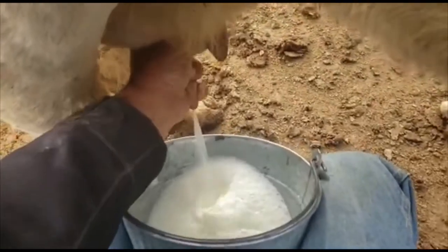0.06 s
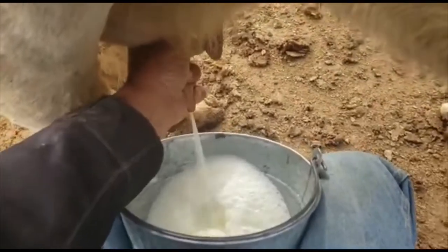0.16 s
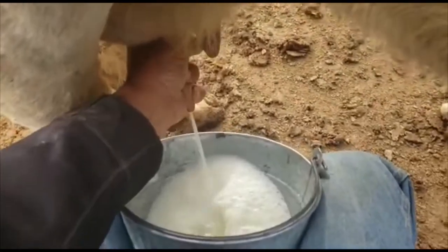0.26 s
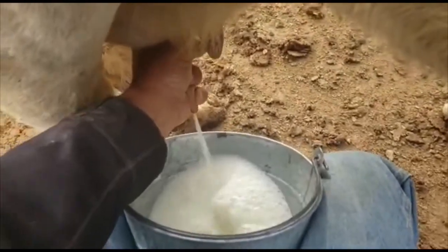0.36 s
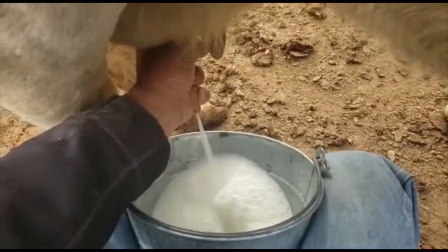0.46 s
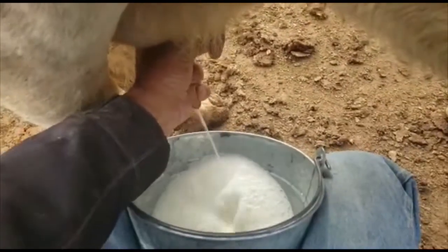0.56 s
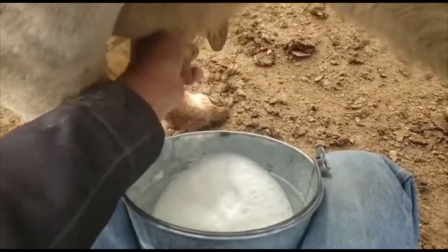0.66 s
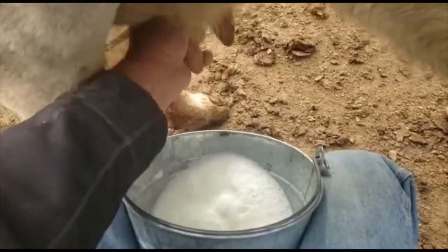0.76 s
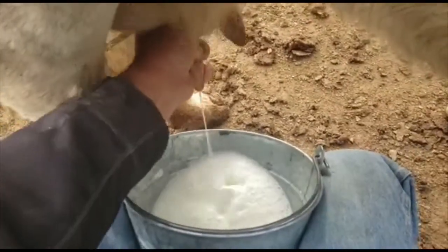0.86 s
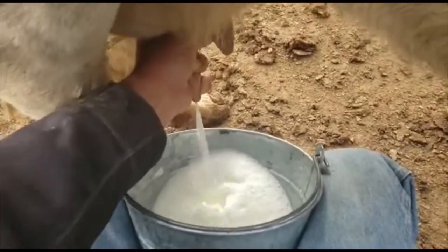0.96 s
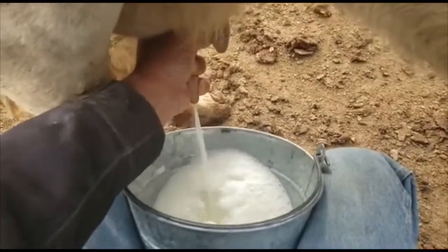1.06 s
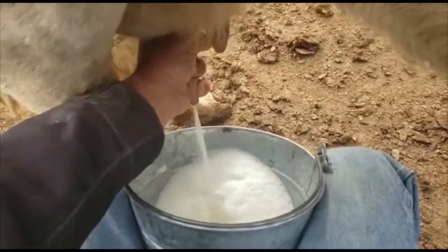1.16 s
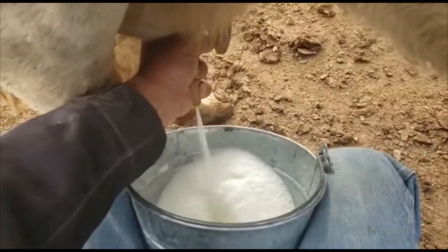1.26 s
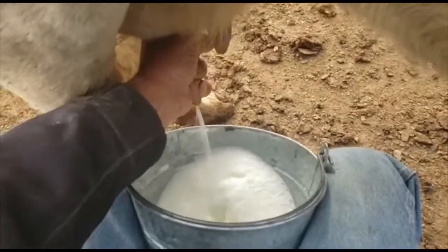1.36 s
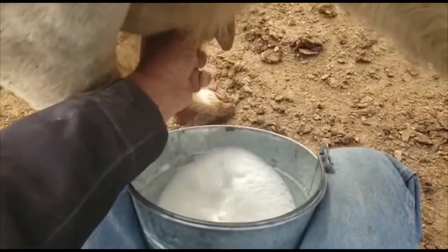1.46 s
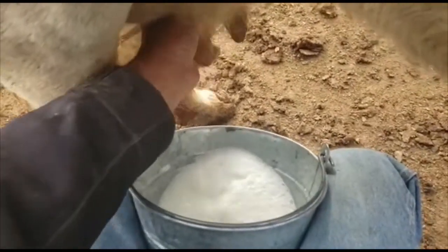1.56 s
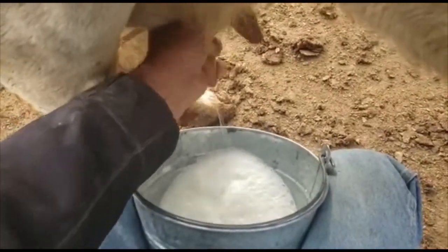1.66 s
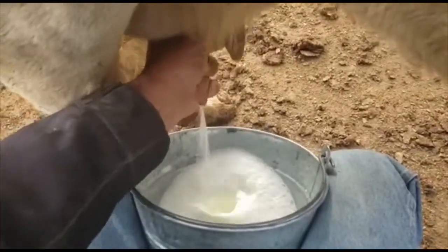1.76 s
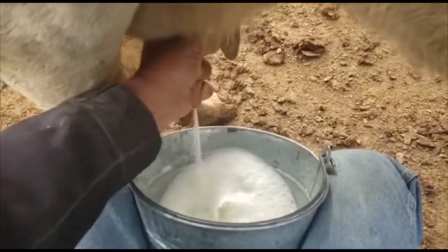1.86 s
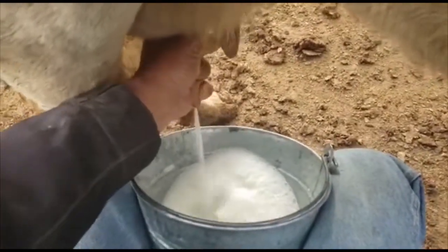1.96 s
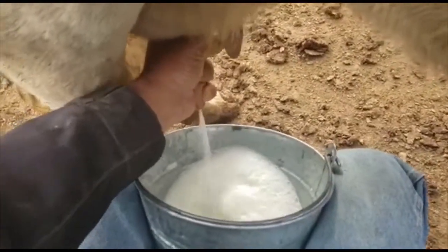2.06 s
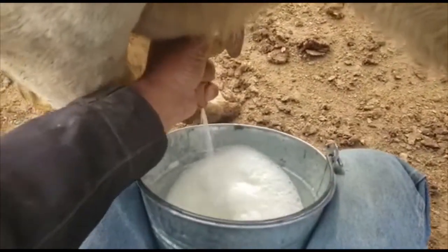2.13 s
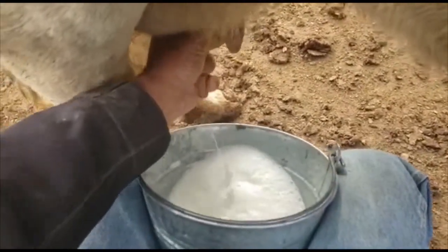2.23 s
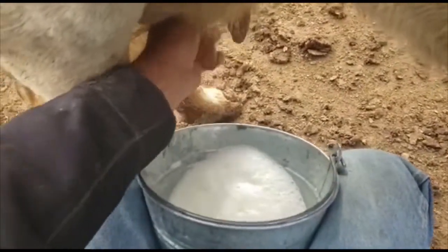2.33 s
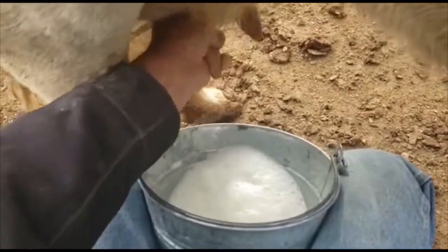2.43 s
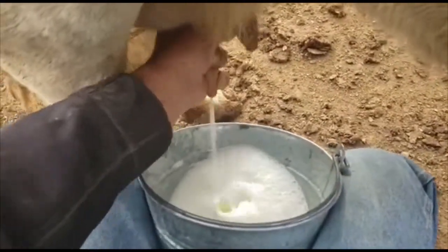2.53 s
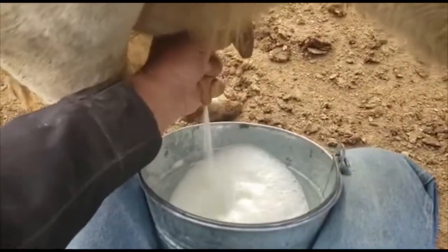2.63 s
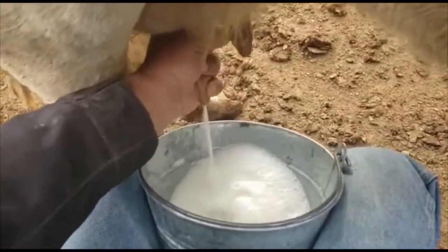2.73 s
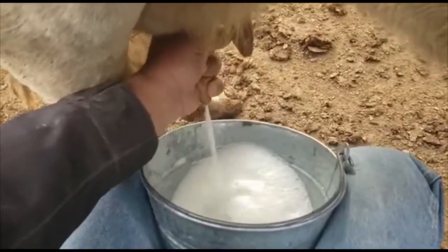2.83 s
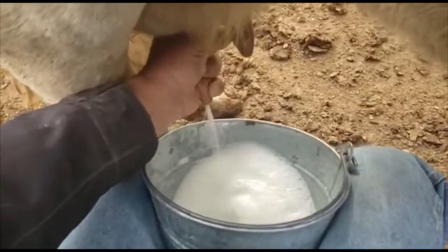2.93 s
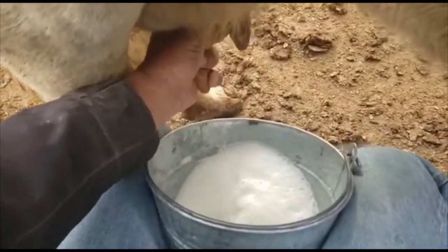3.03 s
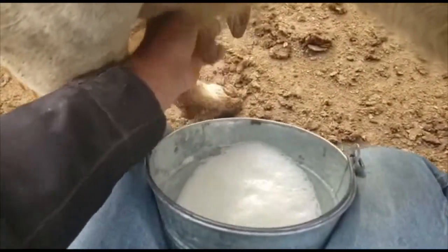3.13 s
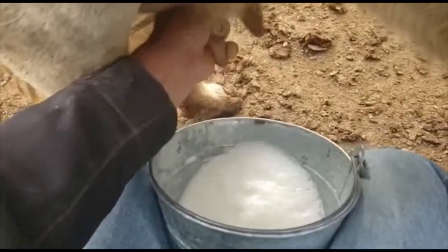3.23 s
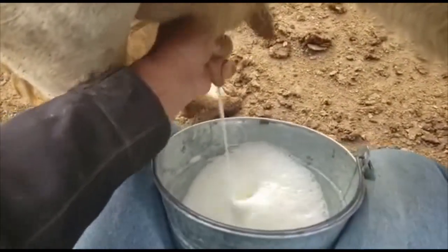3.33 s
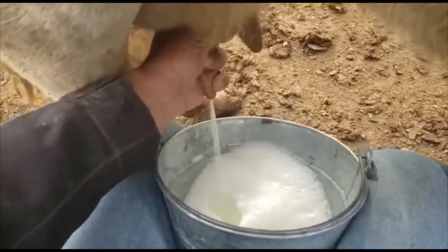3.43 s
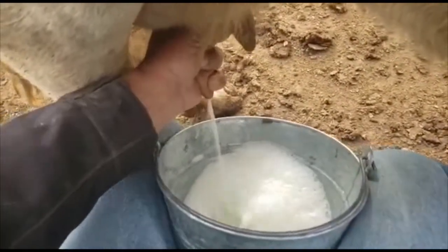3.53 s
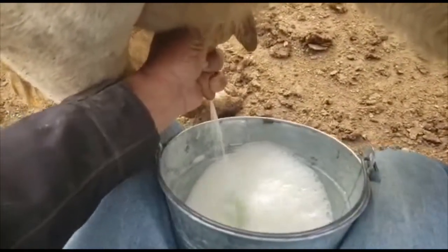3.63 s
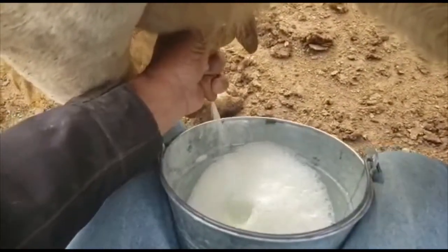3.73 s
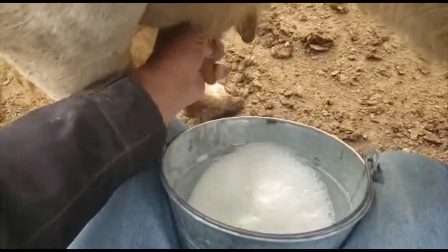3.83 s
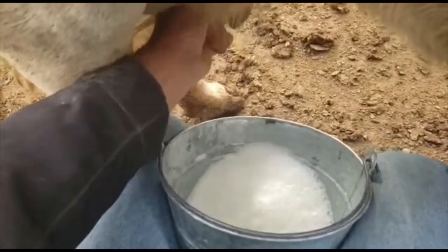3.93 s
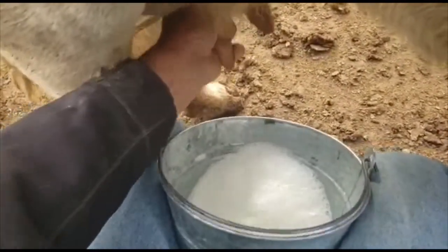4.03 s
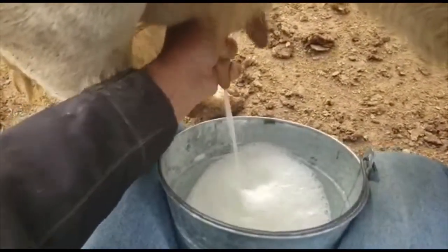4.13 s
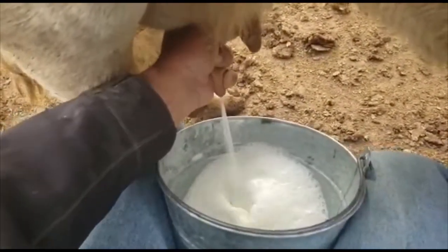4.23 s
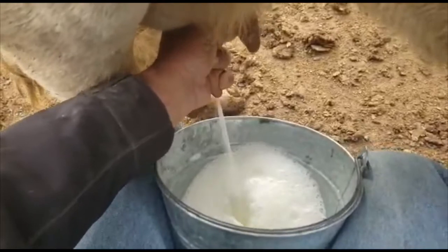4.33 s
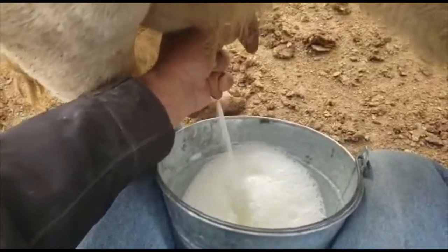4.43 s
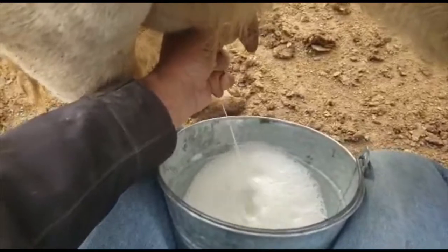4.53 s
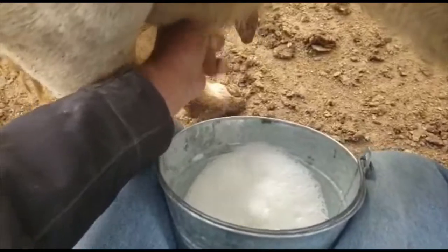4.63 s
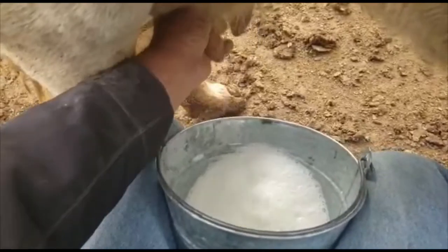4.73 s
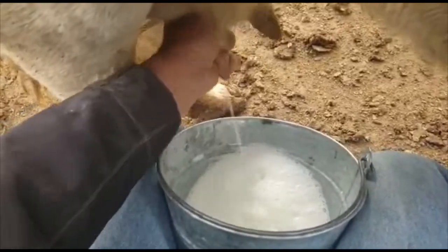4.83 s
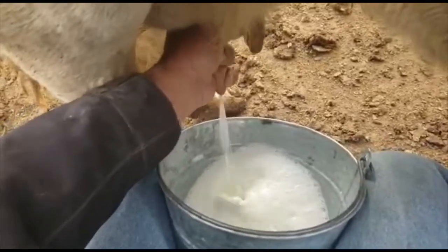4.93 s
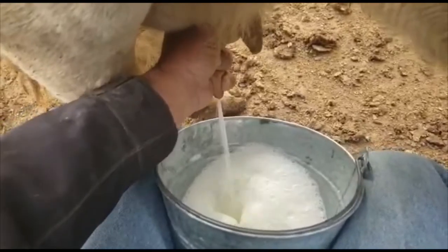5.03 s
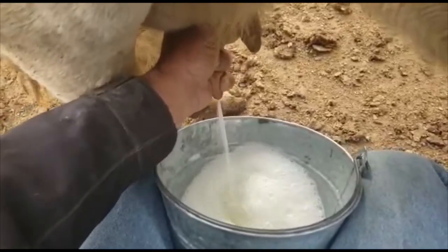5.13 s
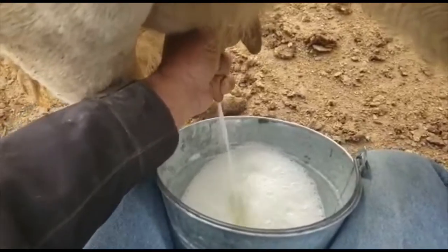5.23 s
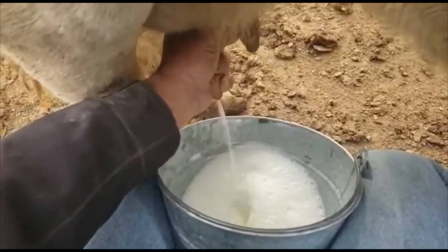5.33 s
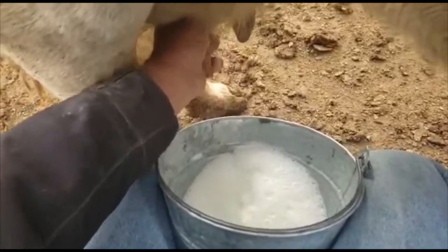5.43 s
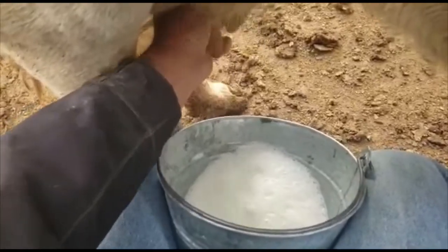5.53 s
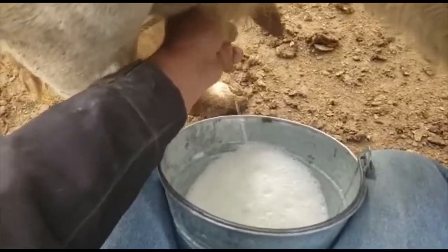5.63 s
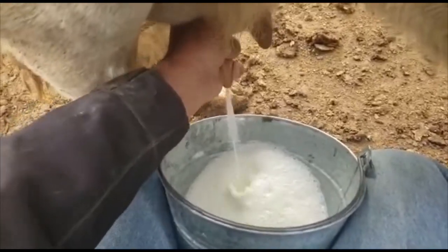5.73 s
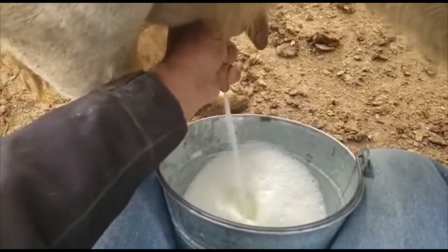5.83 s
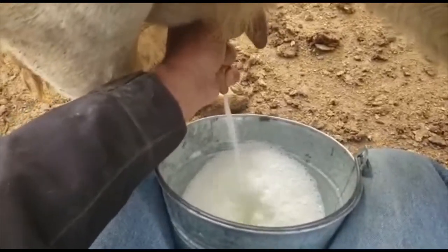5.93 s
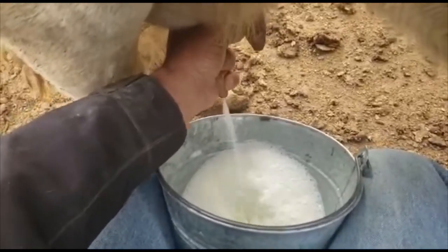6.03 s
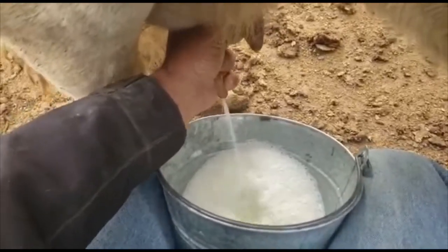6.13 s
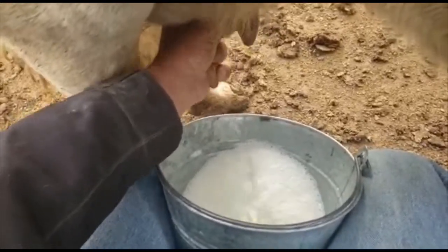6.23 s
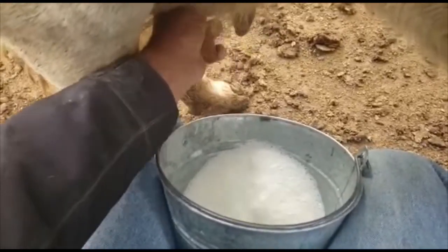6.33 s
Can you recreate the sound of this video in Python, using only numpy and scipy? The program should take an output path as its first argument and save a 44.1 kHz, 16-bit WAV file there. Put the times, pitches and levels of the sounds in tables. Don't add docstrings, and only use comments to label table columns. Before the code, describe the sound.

Rhythmic jets of milk hiss and gurgle into a foamy metal pail, with splattering drops between squirts and a distant vehicle accelerating.

```python
import sys
import numpy as np
from scipy import signal
from scipy.fft import rfft, irfft, next_fast_len
from scipy.io import wavfile
from scipy.ndimage import uniform_filter1d

SR = 44100
rng = np.random.default_rng(int(sys.argv[2]) if len(sys.argv) > 2 else 0)


def file_out(sig):
    cols = np.atleast_2d(sig).T
    lim = np.clip(cols, -1, 1)
    pcm = np.round(lim * 32767).astype(np.int16)
    wavfile.write(sys.argv[1], SR, pcm)


def invert_db(level):
    return 10 ** (np.asarray(level, dtype=float) / 20)


N = 281342

# start in seconds, time to punch through the foam in seconds, length in seconds,
# hiss level in dB, slackening time in seconds.
SQUIRTS = [
    (-.025, 0.041, 0.65, -35.5, 0.049),
    (0.836, 0.069, 0.58, -35.5, 0.019),
    (1.666, 0.067, 0.57, -35, 0.058),
    (2.472, 0.081, 0.52, -37.5, 0.043),
    (2.923, 0.04, 0.1, -57, 0.0074),
    (3.276, 0.068, 0.53, -35, 0.069),
    (4.04, 0.0051, .52, -37.5, 0.044),
    (4.811, 0.061, 0.58, -37, 0.057),
    (5.633, 0.067, 0.59, -37.5, 0.064),
]
# body level in dB re hiss, punch share as a ratio.
LANDINGS = [(3, 0.7), (0, 1.3), (3, 1.1), (2, .9), (0, .9), (.5, 0.18), (-.5, 0.5), (1, 2.2), (-1, 2.1)]
# frequency in Hz, level in dB per Hz.
HISS_SPECTRUM = [(1400, -24.5), (2300, -2), (2900, -3), (3300, -2), (4400, -1.5), (5000, 1), (7400, 0),
                 (8200, -8.5), (9200, -8), (11000, -5.5), (12300, 1.5), (14000, -2), (15600, 1.5),
                 (16300, -5)]
# start in seconds, peak in dB, length in seconds,
# fall along it in dB, low slap in dB re peak.
DRIBBLES = [(0.042, -33.5, 0.079, 3.5, 4), (0.017, -20, 0.01, 28, 6), (0.028, -28, 0.01, 13, 14.5),
            (0.874, -22.5, 0.018, 23, 11), (1.747, -29.5, 0.01, 5, 4.5), (0.826, -31, 0.0094, 12.5, -17),
            (1.42, -36, 0.0062, 10, -5), (1.662, -36, 0.012, 8, -22), (2.46, -39.5, 0.014, 2, -17),
            (3.036, -43, 0.01, 16, 0), (3.82, -32, 0.02, 5, -2.5), (4.037, -9.5, 0.03, 13.5, -14.5),
            (4.114, -17, 0.02, 16, -9.5), (4.657, -30, 0.011, 3, -7), (4.803, -35.5, 0.013, 15, -21),
            (5.461, -23, 0.0091, 14, -10), (5.468, -29.5, 0.015, 3.5, -7), (3.268, -39, 0.01, 10, -34.5),
            (5.579, -31.5, 0.0087, 5, -7.5), (5.621, -39.5, 0.011, 3, -9), (5.676, -28, 0.011, 0, -1.5),
            (5.687, -28.5, 0.034, 2, -27), (5.927, -31.5, 0.066, 3.5, -26), (5.998, -35, .07, 6, -22),
            (6.099, -36, 0.094, 11, -28), (5.647, -30, 0.01, 11, -18), (6.302, -40.5, .01, 22, 2)]
# frequency in Hz, level in dB per Hz.
SLAP_SPECTRUM = [(150, -43), (280, 12), (500, 4), (800, -9.5), (1300, -1.5), (2000, -15.5), (3000, -52)]
# start in seconds, peak in dB, T60 in seconds.
SPARKS = [(0.2383, -39, 0.012), (0.255, -18.5, 0.014), (0.8479, -28, 0.012), (1.6985, -24, 0.012),
          (2.4951, -36, 0.013), (2.5167, -23, 0.018), (2.5869, -40, 0.012), (2.6962, -17.5, 0.012),
          (2.809, -21.5, 0.014), (2.897, -23, 0.014), (3.0064, -41, 0.012), (3.3088, -32, 0.013),
          (3.3357, -27, 0.012), (3.7363, -36, 0.012), (4.0375, -14, 0.0071), (4.1, -24, 0.012),
          (4.1818, -32, 0.0084), (4.321, -27, 0.012), (4.831, -21, 0.013), (5.1202, -37, 0.012),
          (5.462, -37, 0.012), (5.631, -36, 0.011), (5.662, -22, 0.014), (6.0933, -19, 0.012)]
# start in seconds, peak in dB, pitch in Hz, T60 in seconds.
SPITS = [(0.021, -19.5, 2470, .005), (.026, -24.5, 4060, 0.011), (0.081, -28, 4050, 0.0091),
         (.8925, -31, 7000, .01), (.9045, -32, 7100, 0.0055), (1.2153, -22.5, 5850, .006),
         (1.744, -27, 3380, 0.0089), (1.748, -27, 6900, 0.0065), (3.2774, -40, 4050, .008),
         (4.398, -32, 4820, 0.0074), (6.12, -33, 4894, 0.013), (6.3006, -42.5, 5050, .008),
         (6.356, -65, 7360, 0.0076), (0.787, -52, 4300, .015), (5.96, -33, 4970, 0.011),
         (6.097, -36.5, 5200, 0.006), (0.2563, -44, 4690, 0.008), (0.2845, -20, 5260, 0.0056),
         (0.875, -15.5, 3680, 0.004), (0.9052, -17.5, 3850, 0.0057), (1.695, -23, 4100, 0.0026),
         (1.7372, -16, 3480, 0.0047), (2.515, -35, 7850, 0.008), (2.5636, -26, 6140, 0.013),
         (2.693, -54, 12200, 0.0063), (2.8984, -36, 7230, 0.0072), (3.006, -46, 7300, .009),
         (3.0355, -51, 7500, 0.0086), (3.31, -32, 4150, 0.011), (3.769, -32.5, 5270, 0.0055),
         (4.0381, -15.5, 4870, 0.0092), (4.2332, -17, 5660, 0.0038), (4.476, -34, 5200, 0.0099),
         (4.832, -37, 4230, 0.011), (4.8553, -16, 7950, 0.0061), (4.869, -21.5, 5450, 0.0084),
         (4.8875, -17, 5100, 0.0063), (4.923, -27, 5400, 0.0093), (5.7029, -13, 4750, 0.0028),
         (6.077, -23, 6200, 0.0049)]
# start in seconds, # peak in dB,
# pitch in Hz.
GULPS = [(0.031, -18, 276), (0.154, -20, 316), (0.288, -28, 294), (0.309, -18.5, 324), (.545, -25.5, 407),
         (0.874, -20, 269), (.954, -22.5, 320), (1.104, -16.5, 258), (1.296, -22, 338), (1.691, -23, 420),
         (1.737, -34, 412), (1.838, -25, 332), (2.019, -21, 323), (2.123, -19, 333), (2.504, -25, 464),
         (3.294, -26.5, 430), (3.338, -31, 433), (3.356, -17.5, 445), (3.561, -26, 377), (3.592, -21, 342),
         (4.047, -22, 278), (4.269, -22.5, 376), (4.302, -22, 353), (4.885, -21.5, 442), (4.963, -31, 306),
         (5.064, -23.5, 416), (5.26, -30.5, 400), (5.664, -27, 452), (5.83, -18, 316), (5.974, -19, 312),
         (0.217, -20, 310), (0.26, -19, 335), (0.357, -30, 320), (0.451, -42, 332), (0.845, -27, 400),
              (0.984, -21.5, 236), (1.18, -21, 330), (1.204, -32, 280), (1.366, -27, 375),
              (1.898, -25, 317), (1.939, -29, 310), (2.053, -29.5, 320), (2.542, -31, 296),
              (2.598, -30, 344), (2.657, -30, 354), (2.771, -27, 300), (2.849, -28, 350),
              (2.886, -22.5, 315), (3.422, -26.5, 353), (3.482, -30, 320), (3.691, -27, 288),
              (3.819, -34, 256), (4.119, -33, 340), (4.206, -26.5, 412), (4.356, -26, 288),
              (4.661, -43.5, 296), (4.818, -35.5, 465), (4.856, -26, 470), (5.124, -26, 291),
              (5.182, -21, 287), (5.469, -34, 295), (5.585, -34.5, 285), (5.875, -23, 350),
              (5.921, -31, 274)]
# start in seconds, peak in dB, pitch in Hz.
POPS = [(0.071, -35, 1080), (0.189, -38, 806), (0.305, -48, 1640), (0.396, -30, 2280), (0.922, -35, 1150),
        (1.246, -41, 926), (1.393, -43, 980), (1.703, -35, 748), (1.76, -42, 1770), (1.874, -38, 929),
        (2.121, -39, 920), (2.522, -31, 1000), (2.539, -34, 1020), (2.64, -39, 1040), (2.708, -34, 2160),
        (3.312, -35.5, 1170), (4.118, -32, 1190), (4.448, -53, 1000), (4.834, -36, 1190),
        (4.944, -41.5, 974), (5.088, -32, 2447), (5.286, -45, 972), (5.661, -43, 1230), (5.785, -33, 1730),
        (6.08, -41, 980)]
# start in seconds, peak in dB, pitch in Hz, T60
# in seconds.
MORE_BUBBLES = [(0.02, -24, 1020, 0.022), (0.03, -3.5, 440, 0.016), (0.875, -29, 1660, 0.0071),
                (1.736, -29, 1860, 0.02), (0.608, -45, 870, 0.025), (0.874, -16, 1090, 0.0029),
                (0.889, -43, 885, 0.025), (1.732, -28, 1110, 0.025), (2.506, -37.5, 1150, 0.038),
                (2.561, -48, 746, 0.022), (2.94, -32, 724, 0.019), (3.037, -55, 1470, 0.037),
                (3.336, -20.5, 1180, 0.01), (3.422, -39, 1230, 0.027), (3.603, -39.5, 930, 0.034),
                (4.082, -20, 1180, 0.014), (4.099, -31, 1180, 0.032), (4.172, -38, 1160, 0.048),
                (4.197, -25.5, 1210, 0.015), (4.848, -22, 1250, 0.013), (4.882, -36, 954, 0.029),
                (5.678, -28.5, 1250, 0.022), (5.702, -39, 1200, 0.031)]
# frequency in Hz, level in dB per Hz.
FIZZ_SPECTRUM = [(250, -22), (330, 9), (450, 10.5), (700, -1), (1100, -11), (2000, -4), (3300, -6),
                 (4800, -2), (7300, 0), (8300, -18), (9800, -19), (12000, -2.5), (15600, -1.5),
                 (16300, -15)]
# peak time in seconds, fizz level in dB, settling in dB per second.
STIRS = [(.5, -59.5, 36), (.81, -61, 30), (1.44, -56.5, 19), (2.18, -60, 45), (2.45, -73, 30),
         (2.98, -55, 50), (3.1, -62, 80), (3.74, -66, 25), (3.86, -51, 56), (3.96, -64, 62),
         (4.55, -72, 60), (4.69, -66.5, 52.5), (5.34, -68, 24), (5.49, -56, 112), (6.17, -58, 108.5),
         (6.33, -63.5, 86)]
# centre in Hz, width in Hz, gain in dB.
PAIL_MODES = [(1020, 410, 3), (1359, 110, -8.5), (1660, 450, 4), (2100, 250, -2), (3303, 93, 6),
              (4000, 98, 4.5), (4750, 160, 5), (5880, 740, 4), (6990, 210, 3.5), (7530, 310, 4),
              (11400, 290, 4)]
# time in seconds, centre in Hz, depth from 0 to 1.
ECHO_NOTCH = [(0, 2330, 0.7), (.14, 2300, 0.65), (.4, 2350, 0.38), (.9, 2410, 0.74), (1.3, 2470, 0.55),
              (1.71, 2350, 0.7), (1.85, 2350, 0.53), (2.1, 2250, 0.46), (3.2, 2800, 0.17), (3.3, 2680, 1),
              (3.42, 2820, 0.16), (3.7, 2080, 0.2), (6.38, 2090, 0.52)]
# start in seconds, peak in dB, pitch in Hz, T60 in seconds.
KNOCKS = [
    (0.344, -23, 52, 0.09),
]
# time in seconds, shaft rate in Hz, level in dB.
PULL = [(0, 33.66, -38), (.75, 42.1, -38), (1.16, 49, -35), (1.58, 54.6, -37), (1.97, 61.2, -39),
        (2.3, 66, -40), (2.7, 70.6, -39), (3.0, 73.4, -41), (3.1, 71.1, -49), (3.23, 65.4, -52),
        (3.46, 56.3, -50), (3.85, 47.3, -52.5)]
# time in seconds, shaft rate in Hz, level in dB.
CRUISE = [(3.8, 35.46, -50.5), (4.0, 37.3, -47.5), (4.12, 41.33, -48), (4.3, 40.6, -47.5),
          (5.43, 44.63, -50), (5.75, 48.3, -47.5), (6.19, 49.12, -45), (6.38, 51.6, -45.5)]
# multiple of shaft rate, level pulling in dB, level coasting in dB,
# slope in dB per Hz of shaft above 45 Hz.
ORDER_MIX = [(1, -26, -5, -0.37), (1.5, -23, -35, 0), (2, 0, -5.5, 0), (2.5, -20, -6, 0), (3, 0, 8.5, 0),
             (3.5, -41, -24, 0.5), (4, -5, -22, -0.83), (5, -9.5, -8, -0.5)]
# frequency in Hz, gain in dB.
EXHAUST = [(35, -3), (60, 6), (100, -3.5), (140, 2.5), (180, -4), (220, -8), (260, -4), (400, 2)]
# time in seconds, multiple of shaft rate, # depth
# in dB (negative lifts the order).
FADES = [(0.181, 4, 10.5), (.45, 3, 12), (.8, 2, 10), (1.28, 3, 2.5), (1.7, 2, 12), (2.08, 2, 10.5),
         (2.5, 2, 12.5), (2.65, 3, -3), (2.8, 3, -10), (3.0, 1, 5), (3.27, 1, -14.5), (3.36, 3, -3.5),
         (3.5, 3, 7), (3.93, 4, -6), (3.92, 3, 7), (4.3, 3, 4), (1.55, 3, -6), (3.85, 2, 16), (4.15, 2, 2),
         (5.15, 2, -2), (5.5, 2, -2), (2.28, 2, -2.5), (5.8, 2, -2.5), (5.95, 3, 2.5), (5.949, 2, 5),
         (6.12, 2, 3)]
# frequency in Hz, level in dB per Hz.
ROAD_SPECTRUM = [(25, -30), (45, -6), (80, -2), (140, 6.5), (220, -3), (320, -12.5), (500, -41)]
# time in seconds, level in dB.
ROAD_LEVEL = [(0, -37), (1, -44.5), (2, -42), (3.002, -46), (3.3, -46.5), (4, -45), (5, -48.5),
              (6.38, -51.5)]
# time in seconds, pitch in Hz, level in dB.
LOWING = [(1.2, 76.7, -71), (1.3, 79.5, -58), (1.45, 82.9, -52.5), (1.58, 85.7, -52.5), (1.8, 86.5, -54),
          (1.95, 84, -73), (2.05, 82, -75)]
# frequency in Hz, gain in dB.
THROAT = [(300, -25), (430, 8), (520, 9), (690, 7.5), (780, 9), (900, -5), (1120, 2), (1400, -20)]
# frequency in Hz, level in dB per Hz.
YARD_SPECTRUM = [(220, -5), (320, -11), (450, 7), (650, -26), (1000, -5), (1500, -25)]
# frequency in Hz, level in dB per Hz.
BUFFET_SPECTRUM = [(15, -6), (35, 4), (55, -2), (90, -24), (150, -24)]
# time in seconds, level in dB.
GUSTS = [(0.0, -50), (0.14, -64), (0.37, -40), (0.43, -67), (2.38, -82), (3.2, -60), (5.67, -90),
         (6.38, -62)]
# frequency in Hz, left-right correlation from 0 to 1.
PORT_LIKENESS = [(30, .45), (60, .82), (150, .985), (400, .975), (1100, .88), (2000, .5), (5000, .55),
                 (7000, .33), (15000, .27)]
# frequency in Hz, left minus right in dB.
PORT_BALANCE = [(30, -3), (70, -1), (200, 1.5), (600, 4), (1200, -0.5), (1700, -5), (2200, 9), (3500, -5.5),
                (5000, -10.5), (7500, -3.5), (9000, -0.5), (12000, -2.5), (15500, 2.5)]
# frequency in Hz, phase in radians.
PORT_LEAD = [(0, 0), (1500, .3), (3000, .3), (4200, 1), (5500, 2.5), (7500, 6.5), (10000, 11), (16000, 22)]

FIRST_DB, PUNCH_DB, PUNCH_S, SLACK_DB = -11.5, 3.5, 0.022, -26
ARCH_DB, SHEEN_ARCH_DB, SHEEN_HZ = 1.5, 4.5, 9500
THIN_HZ, THIN_BODY_DB, THIN_SHEEN_DB = 2960, -41, 8.5
BODY_SLACK = 1.75
GULP_DB, GULP_PUNCH_DB, GULP_SLACK = -3, 5.5, 0.82
SMALL_DB, SMALL_PUNCH_DB, SMALL_SAG_DB_PER_S, SMALL_SLACK = -11, 7, 13, 0.61
GULP_CYCLES, POP_CYCLES = 18, 21
FOAM_REST_DB, SWELL_DB_PER_S = -68, 120
FADE_S = 0.079
YARD_DB = -76


def evened(x):
    return x / np.sqrt(np.mean(x ** 2) + 1e-20)


def read(points, hz):
    f, value = np.transpose(points)
    return np.interp(np.log(hz + 1), np.log(f + 1), value)


def over_time(s, values):
    return np.interp(np.arange(N) / SR, s, values)


def along(rows):
    s, *columns = np.transpose(rows)
    t = np.arange(s[0], s[-1], 1 / SR)
    return t, [np.interp(t, s, c) for c in columns]


def add(mix, s, sound):
    part = mix[..., round(s * SR):][..., :sound.shape[-1]]
    part += sound[..., :part.shape[-1]]


def coloured(x, db_of):
    hz = abs(np.fft.fftfreq(4096, 1 / SR))
    log_gain = np.log(invert_db(np.maximum(db_of(hz), -100)))
    taps = np.fft.ifft(np.exp(log_gain - 1j * signal.hilbert(log_gain).imag)).real[:2048]
    return evened(signal.oaconvolve(x, taps[None], axes=1)[:, :N])


def shaped_noise(spectrum):
    return coloured(rng.standard_normal((2, N)), lambda hz: read(spectrum, hz))


def wander(hz, size=N):
    return evened(signal.sosfilt(signal.butter(2, hz, fs=SR, output="sos"), rng.standard_normal(size)))


def ring(db, hz, t60, glide=0., rise=.001):
    t = np.arange(round(t60 * SR) + 20) / SR
    envelope = invert_db(db - 60 * t / t60) * (1 - np.exp(-t / rise))
    return envelope * np.sin(2 * np.pi * hz * t * (1 + glide * t / t60))


def crackle(per_s, spread_db):
    chance, side, size = rng.random((3, N))
    ticks = (chance < per_s / SR) * np.sign(side - .5)
    return evened(ticks * invert_db(-spread_db * np.log(size + 0.016)))


def patter(share, per_s, spread_db):
    flares = uniform_filter1d(crackle(per_s, spread_db) ** 2, size=24)
    return rng.standard_normal((2, N)) * np.sqrt(1 + share * flares)


def patchy(x, patch_db, size=3):
    z = signal.stft(x, nperseg=512, noverlap=384)[2]
    patches = uniform_filter1d(rng.standard_normal(z.shape[1:]), size=size, axis=0)
    patches = uniform_filter1d(patches, size=28, axis=1)
    return signal.istft(z * invert_db(patch_db * evened(patches)), nperseg=512, noverlap=384)[1][:, :N]


def jet_levels():
    start, rise, length, db, slack_s = np.transpose(SQUIRTS)[:, :, None]
    body_db, share = np.transpose(LANDINGS)[:, :, None]
    t = np.arange(N) / SR - start
    on = np.clip(np.minimum(t / 0.0011, (length - t) / 0.034), 0, 1)
    punch = np.exp(-abs(t - rise) / PUNCH_S)
    punch_db = PUNCH_DB * share * punch
    slack_db = SLACK_DB * np.exp(np.minimum(t - length, 0) / slack_s)
    arch = np.sin(np.pi * np.clip(t / length, 0, 1)) - .7
    thin = np.clip(1 - t / rise, 0, 1)
    flow_db = db + FIRST_DB * thin
    sag_db = SMALL_SAG_DB_PER_S * np.clip(t, 0, 1)
    layers_db = (
        body_db + punch_db + ARCH_DB * arch + BODY_SLACK * slack_db + THIN_BODY_DB * np.sqrt(thin),
        punch_db + ARCH_DB * arch + slack_db,
        punch_db + SHEEN_ARCH_DB * arch + slack_db + THIN_SHEEN_DB * thin,
        GULP_DB + GULP_PUNCH_DB * punch + GULP_SLACK * slack_db,
        SMALL_DB + SMALL_PUNCH_DB * punch - sag_db + SMALL_SLACK * slack_db)
    return [(on * invert_db(flow_db + layer_db)).sum(axis=0) for layer_db in layers_db]


def bubble_swarm(low_hz, high_hz, per_s, cycles, spread_db, tilt_db, count=18):
    train, kind, out = crackle(per_s, spread_db), rng.integers(0, count, N), np.zeros(N)
    for k, hz in enumerate(np.geomspace(low_hz, high_hz, count)):
        bubble = ring(tilt_db * k / count, hz, cycles / hz, glide=0.41, rise=0.74 / hz)
        out += signal.oaconvolve(train * (kind == k), bubble)[:N]
    return evened(np.array([out, np.roll(out, N // 2)]))


def squirts():
    wobble = invert_db(1.6 * wander(45.0) + 0.38 * wander(100))
    hiss = coloured(wobble * patter(0.48, 1200, 3.5), lambda hz: read(HISS_SPECTRUM, hz))
    hiss = patchy(hiss, patch_db=2.8)
    sheen = signal.sosfiltfilt(signal.butter(4, SHEEN_HZ, "high", fs=SR, output="sos"), hiss)
    body = signal.sosfiltfilt(signal.butter(8, THIN_HZ, fs=SR, output="sos"), hiss)
    gulping = evened(bubble_swarm(261.3, 567, 1700, 15.2, 2.15, tilt_db=-8.0) * wobble)
    small = evened(bubble_swarm(704, 2570, 2500, 12.4, 3.45, tilt_db=3.5) * wobble)
    layers = (body, hiss - sheen - body, sheen, gulping, small)
    return sum(level * layer for level, layer in zip(jet_levels(), layers))


def dribbles(grains, dull_hiss):
    out, t = np.zeros((2, N)), np.arange(3300) / SR
    slap = coloured(grains, lambda hz: read(SLAP_SPECTRUM, hz))
    for s, db, length, fall_db, slap_db in DRIBBLES:
        part = slice(round(s * SR), round(s * SR) + len(t))
        late = np.maximum(t - length, 0)
        shape = invert_db(db - 6.0 - fall_db * t / length - 3900 * late) * np.minimum(t / 0.0018, 1)
        slop = invert_db(slap_db) * invert_db(2800 * late) * slap[:, part]
        add(out, s, shape * (dull_hiss[:, part] + slop))
    return out


def sparks(grains):
    out, t = np.zeros((2, N)), np.arange(3300) / SR
    spray = coloured(grains, lambda hz: read(HISS_SPECTRUM, hz) - 18.0 * (hz < 8800))
    for s, db, t60 in SPARKS:
        at = round(s * SR)
        add(out, s, invert_db(db - 1.0 - 60 * t / t60) * spray[:, at:at + len(t)])
    return out


def spits(dull_hiss):
    out = np.zeros((2, N))
    for s, db, hz, t60 in SPITS:
        at, tone = round(s * SR), ring(db + 1, .96 * hz, t60, glide=.12, rise=.0003)
        decay = invert_db(db - 60 * np.arange(len(tone)) / SR / t60)
        add(out, s, 1.48 * tone + 0.55 * decay * dull_hiss[:, at:at + len(tone)])
    return out


def single_bubbles():
    out = np.zeros((2, N))
    gulps = [(s, db, hz, GULP_CYCLES / hz) for s, db, hz in GULPS]
    pops = [(s, db, hz, POP_CYCLES / hz) for s, db, hz in POPS]
    for s, db, hz, t60 in gulps + pops + MORE_BUBBLES:
        add(out, s, ring(db + 1.5, hz, t60, glide=0.054, rise=1.57 / hz))
    return out


def drops():
    grains = patter(.5, 1000, 2.7)
    dull_hiss = coloured(grains, lambda hz: read(HISS_SPECTRUM, hz) - 7.9 * (hz > 8500) - 8.6 * (hz < 3800))
    return dribbles(grains, dull_hiss) + sparks(grains) + spits(dull_hiss) + single_bubbles()


def foam():
    fizz = coloured(invert_db(0.41 * wander(23)) * patter(0.15, 660, 3.3), lambda hz: read(FIZZ_SPECTRUM, hz))
    fizz = patchy(patchy(fizz, patch_db=1.0), patch_db=2.5, size=30)
    s, db, settle_db_per_s = np.transpose(STIRS)[:, :, None]
    t = np.arange(N) / SR - s
    stirred = invert_db(db + np.minimum(SWELL_DB_PER_S * t, -settle_db_per_s * t))
    return np.sqrt(invert_db(FOAM_REST_DB) ** 2 + (stirred ** 2).sum(axis=0)) * fizz


def pail(x):
    def ripples_db(hz):
        return sum(db / (1 + (2 * (hz - f) / width) ** 2) for f, width, db in PAIL_MODES)

    x = coloured(x, ripples_db) * np.sqrt(np.mean(x ** 2))
    s, hz, depth = np.transpose(ECHO_NOTCH)
    turn = np.exp(2j * np.pi * np.cumsum(over_time(s, hz)) / SR)
    r = np.exp(-np.pi * 550. / SR)
    band = 2 * (turn * signal.lfilter([1 - r], [1, -r], x / turn)).real
    return x - np.clip(over_time(s, depth), 0, 1) * band


def knee():
    out, port_gain = np.zeros((2, N)), invert_db(np.array([[4.], [-11.]]))
    for s, db, hz, t60 in KNOCKS:
        add(out, s, port_gain * ring(db + 11.5, hz, t60, glide=0.062, rise=1.4 / hz))
    return out


def engine(rows, unsteady):
    t, (hz, level_db) = along(rows)
    coasting = uniform_filter1d(1. * (np.gradient(hz) * SR < -15), size=2000)
    turn = 2 * np.pi * np.cumsum(hz * (1 + 0.0052 * unsteady * wander(11.4, size=len(t)))) / SR
    tone = np.zeros(len(t))
    for k, pull_db, coast_db, rev_db_per_hz in ORDER_MIX:
        db = level_db + pull_db + (coast_db - pull_db) * coasting
        db = db + rev_db_per_hz * (hz - 45) + read(EXHAUST, k * hz)
        for s, order, depth_db in FADES:
            if round(order) == round(k, 1):
                db = db - depth_db * np.exp(-((t - s) / FADE_S) ** 2)
        level = invert_db(db + 1.41 * unsteady * wander(9.5, size=len(t)))
        tone -= np.sqrt(2) * level * np.cos(k * turn + 1.286 * k * k)
    fade_in = (t - t[0] + 0.058 * (t[0] == 0)) / 0.031
    fade = np.clip(np.minimum(fade_in, (t[-1] - t) / 0.024), 0, 1)
    return t[0], np.array([tone, 0.7 * np.roll(tone, 900)]) * fade


def vehicle():
    out = invert_db(over_time(*np.transpose(ROAD_LEVEL))) * shaped_noise(ROAD_SPECTRUM)
    for rows, unsteady in ((PULL, .75), (CRUISE, 2.2)):
        add(out, *engine(rows, unsteady))
    return out


def cow():
    t, (hz, db) = along(LOWING)
    turn = 2 * np.pi * np.cumsum(hz * (1 + 0.0055 * wander(21, size=len(t)))) / SR
    voice, out = np.zeros(len(t)), np.zeros(N)
    for k in range(3, 18):
        voice += invert_db(read(THROAT, k * hz) + 1.5 * wander(25, size=len(t))) * np.cos(k * turn)
    add(out, t[0], invert_db(db) * evened(voice))
    return out


def air():
    murmur = invert_db(YARD_DB + 4.3 * wander(5.3)) * shaped_noise(YARD_SPECTRUM)
    gusts_db = over_time(*np.transpose(GUSTS)) + np.array([[-1.5], [-9.]])
    return ports(murmur) + invert_db(gusts_db) * shaped_noise(BUFFET_SPECTRUM)


def ports(paths):
    size = next_fast_len(N + SR)
    hz, (first, second) = np.fft.rfftfreq(size, 1 / SR), rfft(paths, size)
    same, balance = read(PORT_LIKENESS, hz), invert_db(read(PORT_BALANCE, hz) / 2)
    delay = np.exp(-1j * np.interp(hz, *np.transpose(PORT_LEAD)))
    right = same * delay * first + np.sqrt(1 - same ** 2) * second
    return irfft(np.array([first * balance, right / balance]), size)[:, :N]


def scene():
    far_cow = cow()
    near = ports(pail(squirts() + drops() + foam()) + vehicle())
    return near + knee() + air() + np.array([far_cow, np.roll(far_cow, 14)])


def roll_off(x):
    return signal.sosfilt(signal.butter(12, 16820, fs=SR, output="sos"), x)


def record(dry):
    low_pass = signal.firwin(501, 15900, window=("kaiser", 7), fs=SR)
    limited = signal.oaconvolve(np.tanh(dry), low_pass[None], "same")
    return roll_off(limited)


dry = scene()
out = record(dry)
file_out(out)
```